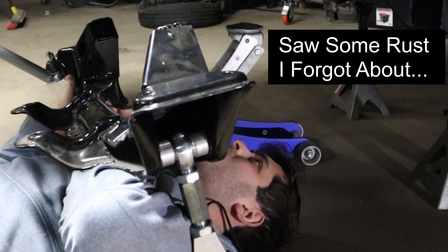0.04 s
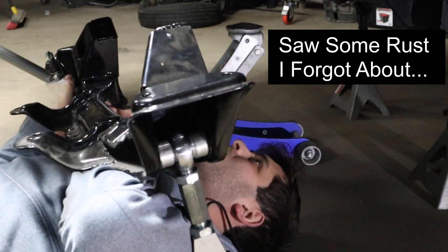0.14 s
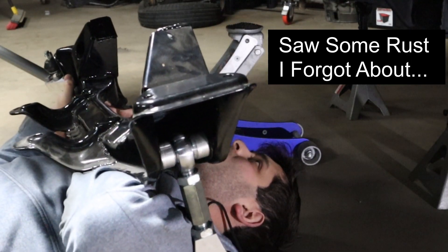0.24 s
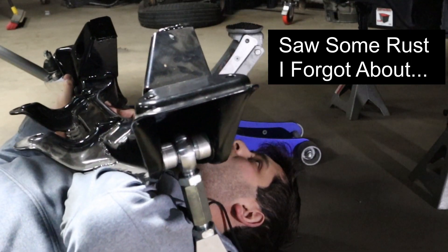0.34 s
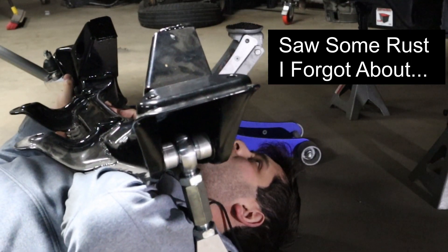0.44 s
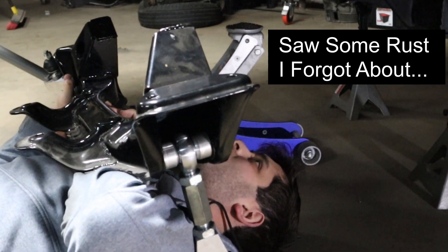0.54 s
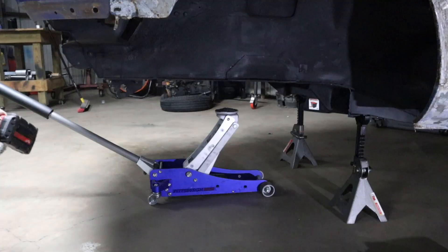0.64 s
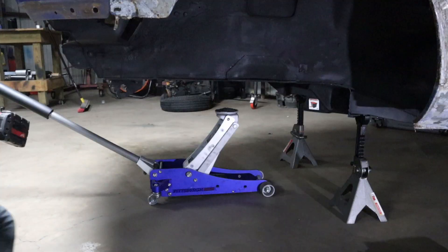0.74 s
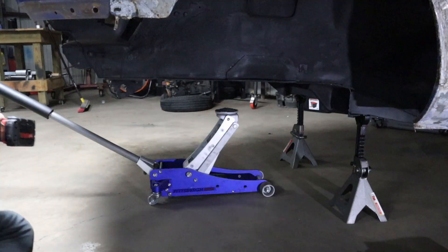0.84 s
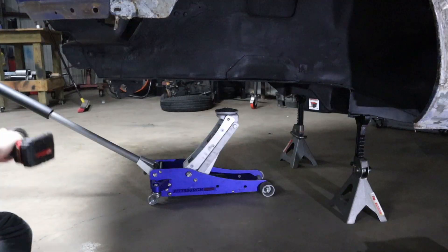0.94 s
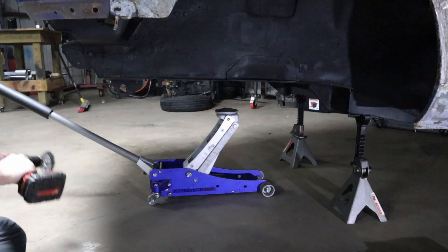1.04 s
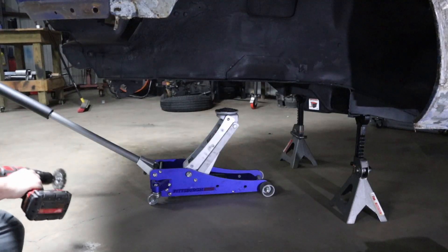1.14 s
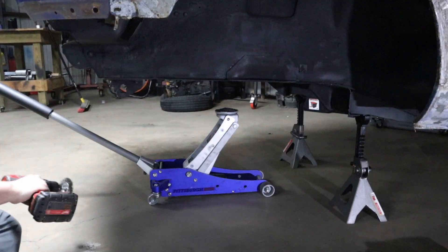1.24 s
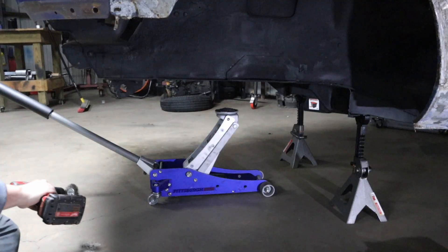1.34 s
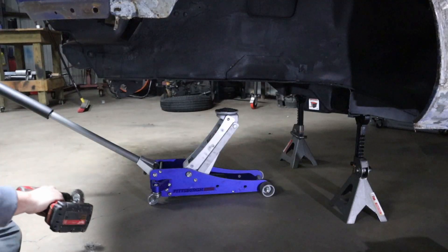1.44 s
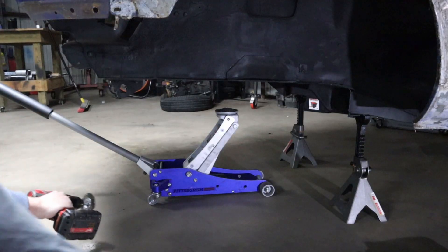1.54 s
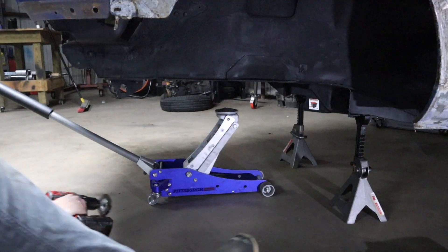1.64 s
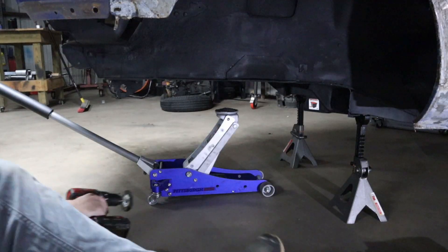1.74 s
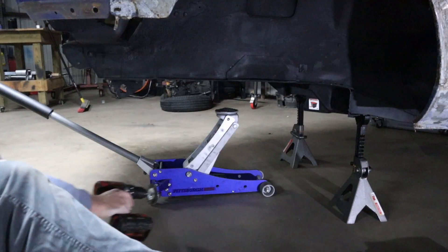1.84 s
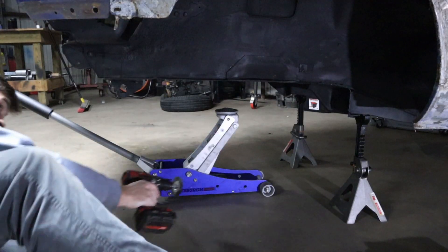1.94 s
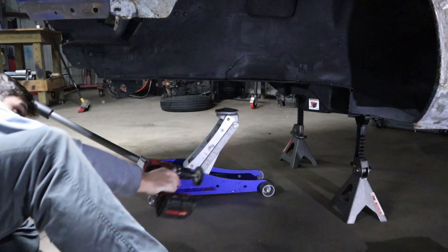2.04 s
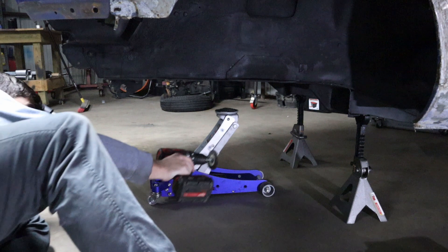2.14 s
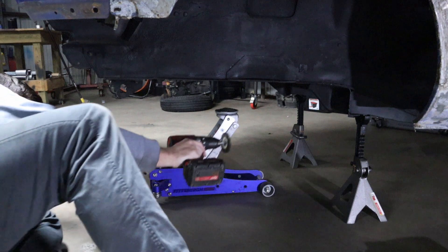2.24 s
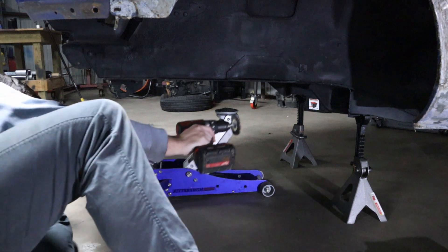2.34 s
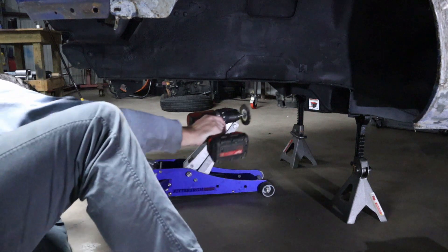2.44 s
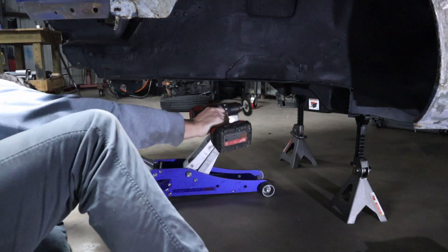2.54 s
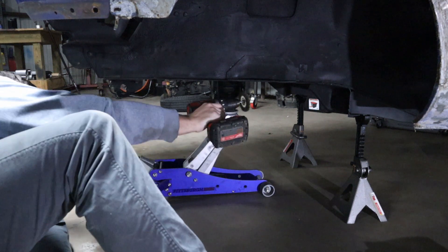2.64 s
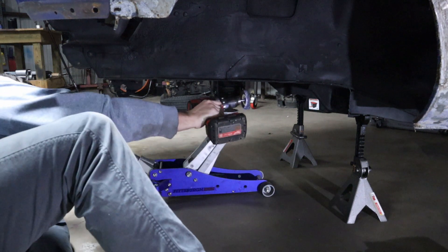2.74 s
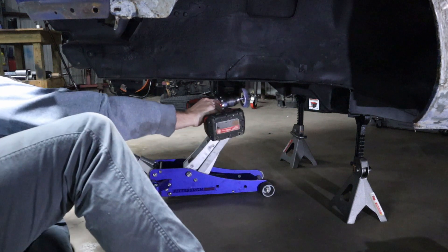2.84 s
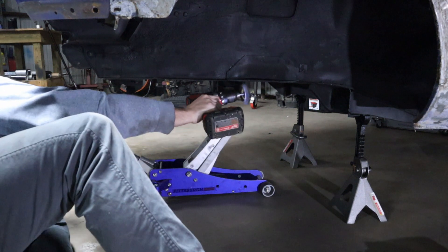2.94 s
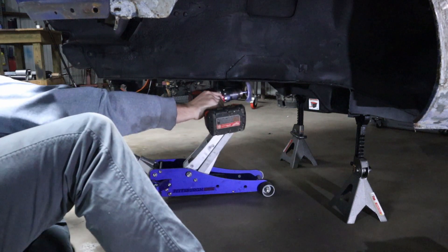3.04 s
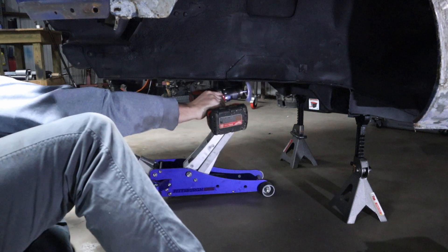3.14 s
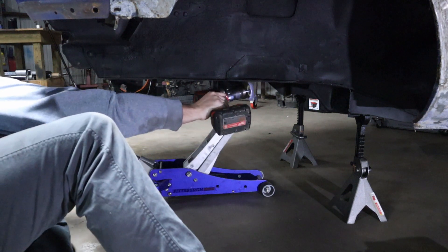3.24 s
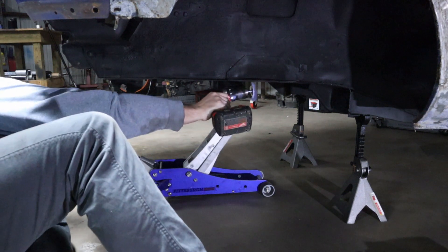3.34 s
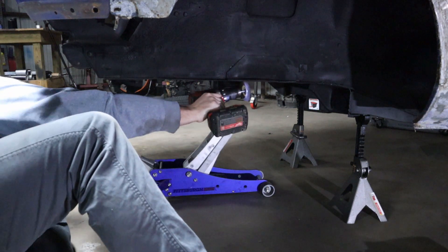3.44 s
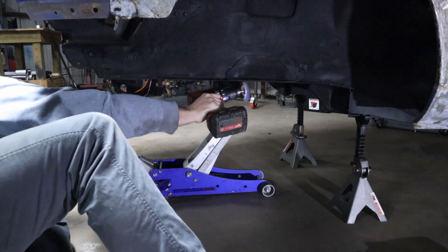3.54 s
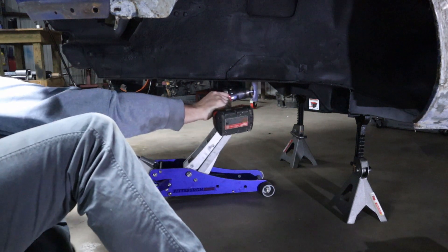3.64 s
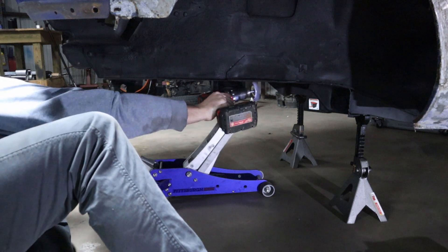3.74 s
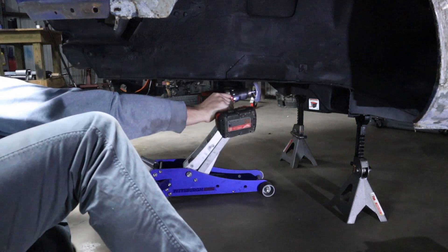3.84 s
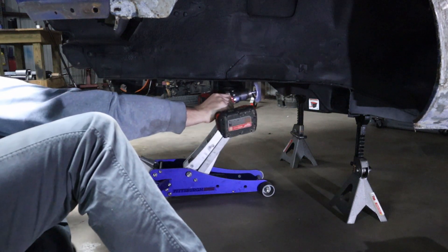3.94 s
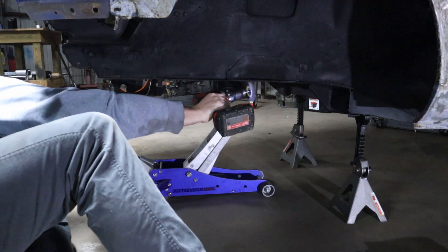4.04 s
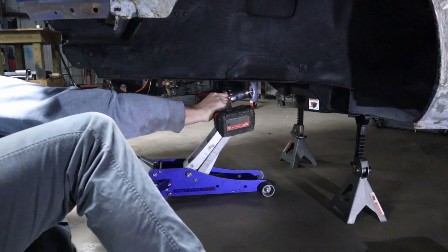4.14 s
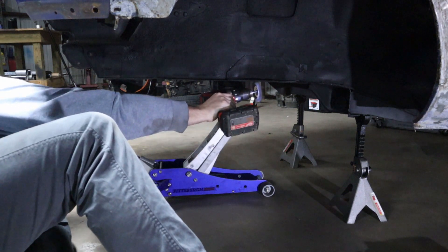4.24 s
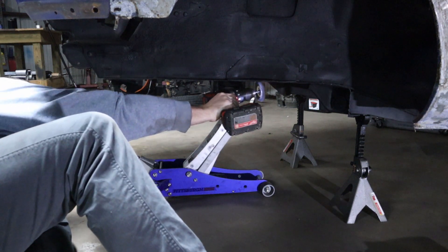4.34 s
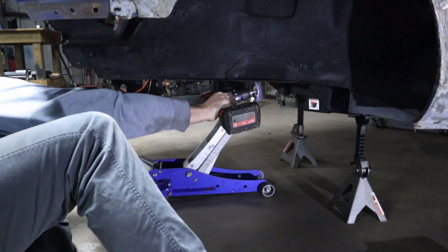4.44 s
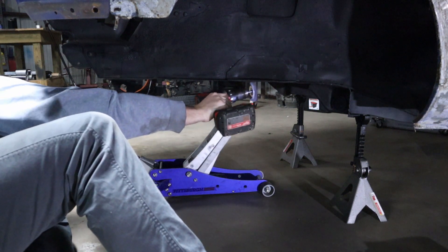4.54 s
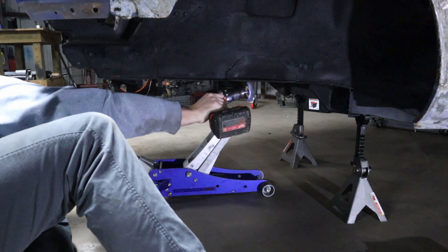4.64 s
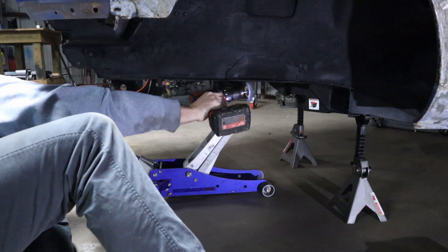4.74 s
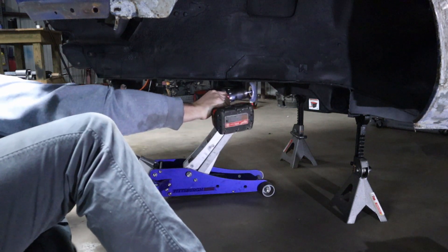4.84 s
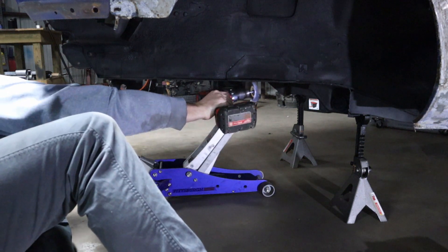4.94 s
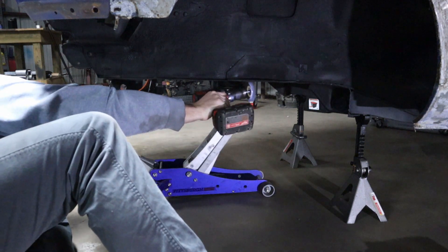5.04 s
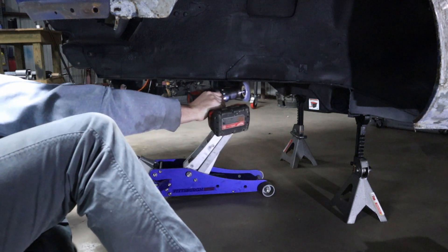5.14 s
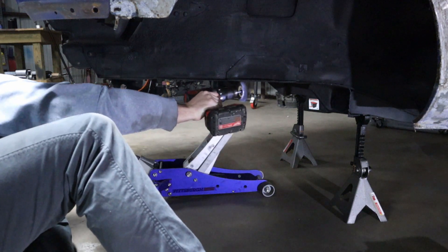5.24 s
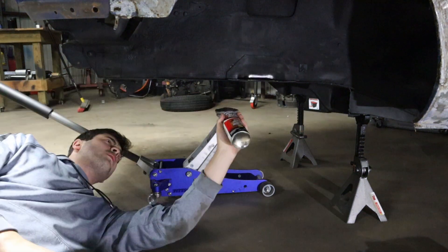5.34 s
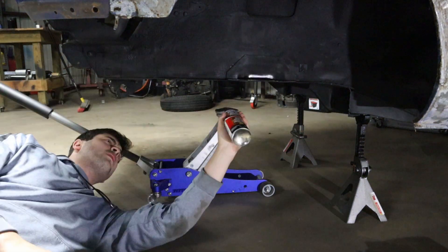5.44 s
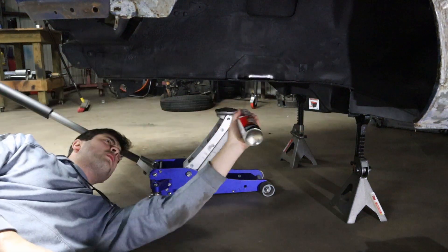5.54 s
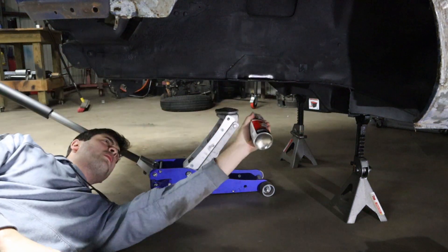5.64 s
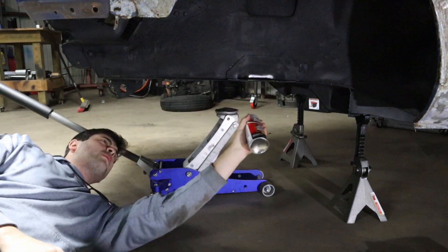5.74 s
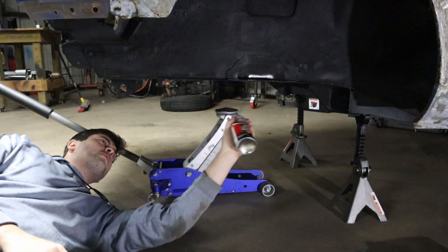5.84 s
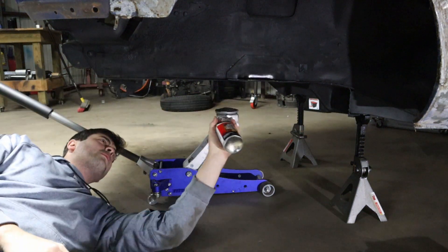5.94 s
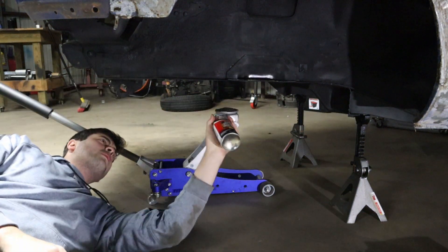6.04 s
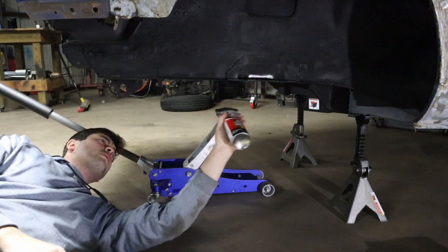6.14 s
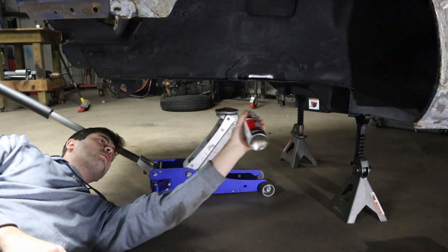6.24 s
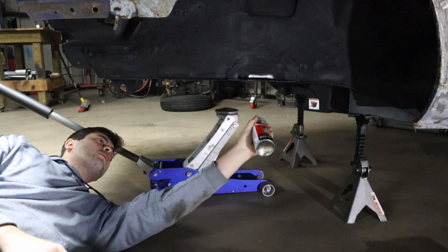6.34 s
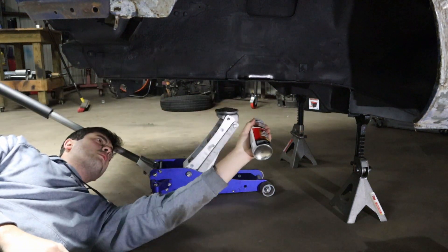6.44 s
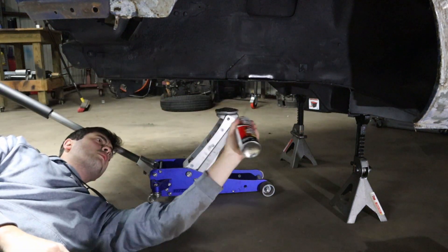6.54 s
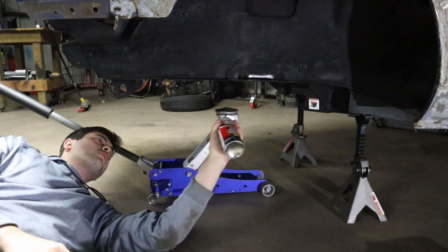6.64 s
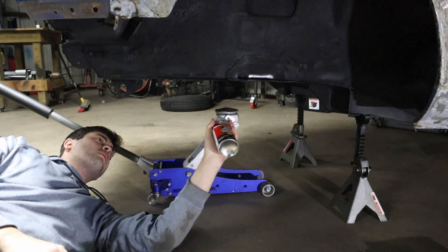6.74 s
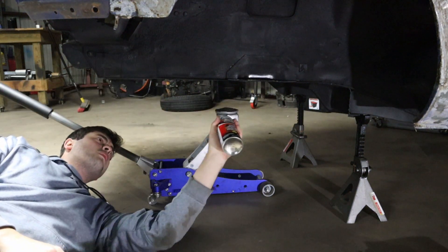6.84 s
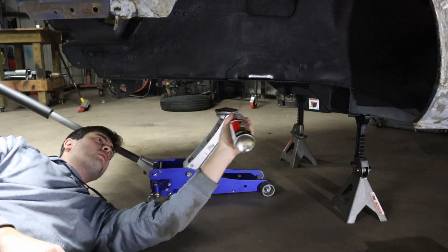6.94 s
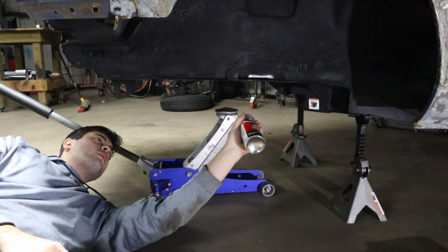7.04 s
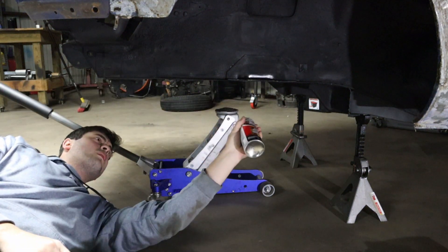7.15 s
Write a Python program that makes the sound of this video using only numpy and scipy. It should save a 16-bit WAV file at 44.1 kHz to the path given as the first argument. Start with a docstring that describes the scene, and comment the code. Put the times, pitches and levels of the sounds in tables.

```python
"""Wire wheel and spray can in a garage

Three shots: near silence; a man slides over the concrete and runs a cordless drill with a wire wheel
against a car's underside; then he gives the spot short bursts from a spray can.
One motor speed drives the gear whine, the rattle of the teeth and the geared-down throb of the wheel.
Grit, cloth, wire and spray are coloured grains or noise; knocks and the mixing ball ring decaying modes.
"""
import sys
import numpy as np
from scipy import signal
from scipy.fft import rfft, irfft
from scipy.io import wavfile

SR = 44100
rng = np.random.default_rng(int(sys.argv[2]) if len(sys.argv) > 2 else 0)


def materialize(psi):
    """Save the field psi as 16-bit PCM at rate SR to the path in sys.argv[1].

    A 1-D psi becomes a single channel; in a 2-D psi each row is a channel.
    """
    bounded = np.clip(np.atleast_2d(psi).T, -1, 1)
    quanta = np.round(bounded * 32767).astype(np.int16)
    wavfile.write(sys.argv[1], SR, quanta)


N = 316990
TIME = np.arange(N) / SR  # s

WORK_CUT_S, SPRAY_CUT_S = .707, 5.3775  # start of the second and third shot
EDGE_HZ = 15750  # upper band edge

# Motor: trigger time, and the time constant with which it nears its running speed
TRIGGER_S, SPIN_UP_S = 2.9345, .086
GEAR_RATIO = 15  # motor turns per wheel turn
# running speed, sagging as the hand leans on the wheel: (t/s, f/Hz in turns per second)
RUNNING_SPEED = [(3.42, 348.9), (3.62, 349.5), (3.74, 349.0), (3.87, 347.7), (4.0, 349.4), (4.14, 347.2),
                 (4.29, 349.2), (4.43, 347.9), (4.51, 346.5), (4.62, 345.9), (4.76, 347.4), (4.93, 348.0),
                 (5.01, 346.7), (5.17, 345.6), (5.3, 346.5)]
# lines of the motor: (multiple of motor speed, level/dB)
MOTOR_LINES = [(2, -49), (3, -53.5), (4, -42.5), (5, -58), (7, -63.5), (9, -52.5), (11, -61), (13, -65),
               (14, -46.5), (16, -48), (17, -48.5), (18, -51.5), (21, -53.5), (22, -53), (25, -65),
               (26, -68), (27, -67), (28, -56.5), (29, -53), (31, -76), (36, -56), (40, -57)]
# lines of the slower gear stage: (multiple of motor speed, level/dB)
SLOW_GEARS = [(10.2, -53.5), (12.3, -47.5)]

# strong gear tones, before lifts and swells:
# (multiple of motor speed, level/dB at full speed, loss/dB at standstill, scattered share at full speed)
WHINE = [(10, -44, 11, 0.18), (15, -39.5, 30, 0.22), (20, -44.5, 21, .7), (30, -45, 35, .5)]
WAVER_HZ = 6  # how fast the scattered share beats against its tone
WHINE_ROUGH_DB, WHINE_ROUGH_HZ = 1.85, 21.9  # quick unevenness of the tooth contact
# housing resonances that the tones glide through: (f/Hz, width f/Hz, lift level/dB)
HOUSING = [(2350, 100, 15), (2720, 90, 9), (4750, 200, 2.5), (6200, 280, 10), (9740, 320, 4.5)]
# the two loudest gear tones swell and fade as the hand moves: (t/s, extra level/dB)
LOW_TONE_SWELL = [(3.1, 1), (3.26, -7), (3.36, 3.5), (3.46, -15), (3.62, 7), (3.73, 5), (3.88, -1.5),
                  (4.62, 0), (4.82, 3.5)]
HIGH_TONE_SWELL = [(3.2, -0.5), (3.5, -9), (3.74, 5.5), (3.87, -10), (3.98, 1), (4.19, 2.5), (4.35, -2.5),
                   (4.58, 5), (4.76, 2.5), (4.89, -6.5), (5.07, 5.5), (5.16, -6), (5.28, 3.5)]

# the wheel shakes the panel: (multiple of wheel speed, relative level/dB)
THROB = [(2, -34), (4, -14.5), (7, -1.5), (8, -7), (9, -12.5), (10, -11), (11, -7), (12, -11), (13, -5.5),
         (14, -12), (15, -11.5), (21, -9.5)]
THROB_DB, THROB_STALL_DB = -57, 86  # gain at full speed; loss at standstill
SEATED_S, SEATED_DB = (3.85, 4.58), 2  # the throb is stronger while the wheel sits flat on the panel
UNSEATED_DB_PER_S = 4  # and it builds up until then

# Rattle of the teeth: colour (f/Hz, level/dB)
RATTLE = [(300, -26), (1500, -11.5), (3200, -6), (4200, 1), (5000, 0), (6200, -1.5), (7200, -8.5),
          (8500, -10), (10200, -10.5), (12500, -13.5), (14000, -19), (15700, -44)]
RATTLE_DB, RATTLE_POWER = -34.5, 1.4  # at full speed, before bites and echoes; power of the speed
# reflections off the car's underside: (delay t/s, level/dB)
ECHOES = [(.0009, -25), (.0017, -33.5), (.0029, -19), (.0044, -11.5)]

# Colour of the car panel under the wheel: (f/Hz, level/dB)
PANEL = [(60, -48), (150, -14), (280, -10.5), (420, -8.5), (560, 2), (800, -7), (1000, -0.5), (1180, -5.5),
         (1400, 4.5), (1850, -3.5), (2250, 5.5), (2480, -1.5), (2750, 5), (3300, -17), (7000, -14)]
SCRAPE_DB, SCRAPE_STALL_DB = -42, 18.5  # at full speed, before bites; loss at standstill
# the wheel bites harder into the rust: (start t/s, end t/s, extra scrape level/dB)
BITES = [(3.334, 3.38, 1.5), (4.223, 4.255, 1.5), (4.777, 4.824, 3.5), (4.969, 5.02, 4.5),
         (5.23, 5.28, 2.5)]
BITE_S, BITE_RATTLE = 0.027, .35  # time constant of grip and release; share of a bite's dB in the rattle

# Body over gritty concrete: colour (f/Hz, level/dB)
DRAG = [(150, -49), (300, -16.5), (450, -7), (680, -1.5), (1050, -4), (1600, -2), (2200, -2), (2800, -2),
        (5300, -3.5), (7500, -15.5), (10000, -28), (13000, -32), (15500, -42)]
# its shoves: (start t/s, end t/s, level/dB)
SHOVES = [(.70, .97, -53.5), (1.06, 1.10, -55), (1.135, 1.16, -43.5), (1.23, 1.29, -43.5),
          (1.33, 1.40, -54), (1.47, 1.52, -45.5), (1.57, 1.59, -52), (1.67, 1.73, -50.5),
          (1.89, 1.92, -53.8), (2.095, 2.52, -53), (2.62, 2.69, -47.8)]
SHOVE_RISE_S, SHOVE_FALL_S = 0.034, 0.025  # time constants
# Cloth of the swinging limbs: colour (f/Hz, level/dB)
SWISH = [(500, -51), (1500, -20), (3200, -14.5), (5200, 0), (6400, 0.5), (8000, -3.5), (9300, -8),
         (11500, -8), (13500, -13.5), (15500, -23)]
# its swishes: (start t/s, end t/s, level/dB)
SWISHES = [(.70, .88, -48), (.92, .96, -51.5), (1.11, 1.14, -54.5), (1.33, 1.43, -53), (1.48, 1.50, -47),
           (1.58, 1.65, -47.5), (1.70, 1.80, -55), (1.895, 1.91, -49.5), (2.105, 2.30, -57),
           (2.17, 2.21, -47), (2.33, 2.44, -45), (2.48, 2.535, -48), (2.66, 2.69, -62)]
SWISH_RISE_S, SWISH_FALL_S = 0.043, 0.025  # time constants
# the weave of the cloth zips over the floor: (middle t/s, bell spread t/s, f/Hz, width f/Hz, level/dB)
ZIPS = [(1.143, 0.033, 4940, 2800, -46.5), (1.49, 0.047, 2920, 895, -45), (1.479, 0.037, 4740, 1800, -43),
        (1.56, 0.018, 1140, 200, -56.5), (1.582, 0.018, 4160, 2800, -40.5),
        (1.673, 0.059, 5260, 900, -50.5), (2.186, 0.029, 5330, 700, -55), (2.41, 0.032, 6500, 1000, -41)]
CREEP_DRAG_DB, CREEP_SWISH_DB = -59, -62.5  # steady contact with the floor between the shoves
LIES_STILL_S, STILL_DB = 2.69, -10.5  # then he settles, and the drag contact drops by this much

# knocks of the drill in the hand: (t/s, peak level/dB, brightness f/Hz)
KNOCKS = [(1.212, -29, 5000), (1.260, -33, 2000), (1.777, -34.5, 1430), (2.820, -53, 10900),
          (2.928, -37.5, 4200), (2.942, -31.5, 3520)]
# ringing modes of its casing: (f/Hz, level/dB, t60 t/s)
CASING = [(644, -7, 0.049), (784, 7.5, 0.011), (1390, 6, 0.012), (1620, 4, 0.012), (2700, -2, 0.025),
          (3500, 5, 0.013), (6050, -7, .015)]

# bursts of the spray can: (start t/s, end t/s, level/dB once the surge has sagged)
BURSTS = [(5.306, 5.474, -56), (5.656, 5.81, -57.5), (5.936, 6.082, -57), (6.3, 6.448, -56.5),
          (6.621, 6.786, -56), (7.047, 7.25, -57)]
# colour of its nozzle: (f/Hz, level/dB)
NOZZLE = [(240, -51), (400, -38), (614, -9.5), (673, -14), (796, -15.5), (1490, -13), (1590, -15),
          (2190, -7), (3410, -9), (3790, -4.5), (5910, 2), (6380, -2), (12100, -5.5), (15500, -15.5)]
# the mixing ball hits the can: (t/s, peak level/dB, brightness f/Hz)
BALL = [(5.851, -54, 3300), (5.872, -58, 3300), (5.909, -42, 12000), (6.497, -49.5, 3000),
        (6.522, -57, 2500), (6.569, -42.5, 8000), (6.608, -49, 8000)]
# ringing modes of the can: (f/Hz, level/dB, t60 t/s)
CAN = [(810, -11, .03), (1555, -8, .04), (1790, -6, 0.036), (2730, -4, .04), (3100, -7.5, .03),
       (3500, -1, 0.028), (4360, -3, .025), (6600, -3, 0.022), (7150, -2, 0.023)]
# the sleeve rubs as the arm sweeps the can: (start t/s, end t/s, level/dB)
SLEEVE = [(6.0, 6.08, -80), (6.56, 6.65, -66.5), (6.78, 6.91, -71), (7.12, 7.19, -72)]
SLEEVE_RISE_S, SLEEVE_FALL_S, SLEEVE_REST_DB = 0.1, 0.038, -78  # time constants; level between rubs

# soft bumps of limbs on the floor: (t/s, peak level/dB, f/Hz, time t/s for a 120 dB decay under the swell)
BUMPS = [(2.025, -49.5, 71.4, 0.18), (2.50, -54.5, 392, 0.083), (2.795, -59, 71, 0.18),
         (5.73, -70, 135, 0.15), (5.98, -68, 289, 0.13), (6.686, -62.5, 278, 0.11),
         (6.755, -59.5, 318, 0.086), (7.092, -60.5, 310, 0.13)]
# Reverberation of the garage: (f/Hz, t60 t/s)
GARAGE = [(150, 0.72), (1000, 0.52), (5000, 0.62), (9000, 0.47), (15000, 0.38)]
# Colour of the room tone: (f/Hz, level/dB)
AIR = [(20, -43), (45, -10), (70, 3), (100, 1), (125, 6.5), (180, -5.5), (400, -10.5), (1000, -18),
       (3000, -22.5), (8000, -22.5), (13000, -38), (15000, -48)]
# Colour of the faint hiss: (f/Hz, level/dB)
HUSH = [(30, -11), (150, -1), (700, -4.5), (3000, -9.5), (12000, -13), (14000, -33)]


def drill():
    """The motor whines through its gears; the teeth rattle each turn; the wire wheel scours the panel."""
    slack = np.exp(-np.maximum(TIME - TRIGGER_S, 0) / SPIN_UP_S)  # share of the speed still to be gained
    speed = curves(RUNNING_SPEED)[0] * (1 - slack)
    turns = np.cumsum(speed * (1 + 0.00038 * drift(30))) / SR
    wheel = turns / GEAR_RATIO
    bite_db = sum(db * stroke(start, end, BITE_S, BITE_S) for start, end, db in BITES)
    force = amp(-140 * slack ** 1.676)  # unbalance grows with speed
    tones = gear_whine(speed, slack, turns) + force * motor_lines(speed, turns)
    tones = tones + force ** 2 * slow_gears(turns) + wheel_throb(slack, wheel)
    rattle = nearby(tooth_rattle(slack, turns, wheel, bite_db))
    scrape = wheel_scrape(slack, wheel, bite_db)
    return tones * ramp(2.955, 0.058) + (rattle + scrape) * ramp(TRIGGER_S, 0.008)


def gear_whine(speed, slack, turns):
    """Tooth tones grow with speed, flare in the housing's resonances and waver."""
    swells_db = curves(LOW_TONE_SWELL) + curves(HIGH_TONE_SWELL) + [0, 0]
    out = 0
    for (order, db, stall_db, scattered), swell_db in zip(WHINE, swells_db):
        lift_db = sum(lift * np.exp(-((order * speed - hz) / width) ** 2) for hz, width, lift in HOUSING)
        rough_db = WHINE_ROUGH_DB * drift(WHINE_ROUGH_HZ)
        level_db = db - stall_db * slack + lift_db + swell_db + rough_db
        out += amp(level_db) * line(turns, order, fade=scattered * (1 - slack), fade_hz=WAVER_HZ)
    return out


def motor_lines(speed, turns):
    """Multiples of the motor speed swell as they glide into a panel resonance."""
    out, top = 0, speed.max()
    for order, db in MOTOR_LINES:
        body_db = np.minimum(read(PANEL, order * speed) - read(PANEL, order * top), 0)
        fade = min(0.025 * order, 1)  # short waves fade more
        out += amp(db + body_db) * line(turns, order, fade, fade_hz=7)
    return out


def slow_gears(turns):
    """The slower gear stage adds wavering lines between the whole multiples of the motor speed."""
    return sum(amp(db) * line(turns, order, fade=1.0, fade_hz=9.9) for order, db in SLOW_GEARS)


def wheel_throb(slack, wheel):
    """Multiples of the wheel speed shake the panel, hardest while the wheel sits flat."""
    shake_db = THROB_DB - THROB_STALL_DB * slack
    shake_db = shake_db - UNSEATED_DB_PER_S * np.maximum(SEATED_S[0] - TIME, 0)
    shake_db = shake_db + SEATED_DB * stroke(*SEATED_S, rise=.12, fall=.04)
    return amp(shake_db) * sum(amp(db) * line(wheel, order, fade=0.39, fade_hz=6) for order, db in THROB)


def tooth_rattle(slack, turns, wheel, bite_db):
    """Noise of the teeth pulses with each turn of motor and wheel and grows with speed."""
    teeth = (1 + 0.13 * np.cos(2 * np.pi * turns)) * (1 + 0.021 * np.cos(2 * np.pi * wheel))
    level = amp(RATTLE_DB + BITE_RATTLE * bite_db) * (1 - slack) ** RATTLE_POWER
    return level * colour(teeth * rng.standard_normal(N), RATTLE)


def wheel_scrape(slack, wheel, bite_db):
    """Countless bristle impacts excite the panel, louder where the wheel bites."""
    bristles = grains(per_s=7000, spread_db=1.0) * (1 + 0.028 * np.cos(2 * np.pi * wheel))
    level_db = SCRAPE_DB - SCRAPE_STALL_DB * slack + bite_db + 1.35 * drift(25)
    return amp(level_db) * colour(bristles, PANEL)


def spray():
    """The valve opens on full pressure, which sags until the finger lifts."""
    flow = np.zeros(N)
    for start, end, db in BURSTS:
        surge = 1 + 4.0 * np.exp(-np.maximum(TIME - start, 0) / 0.028)
        flow += amp(db) * surge * ramp(start, 0.034) * (1 - ramp(end, 0.014))
    return flow * amp(.5 * drift(45)) * colour(rng.standard_normal(N), NOZZLE)


def mixing_ball():
    """The ball strikes the thin can and rings its modes."""
    return hits(BALL, CAN, tick=1.05, tick_t60=0.036, detune=.05)


def sliding():
    """Grit drags under the body while cloth swishes and zips over the concrete in tiny slips."""
    settled_db = STILL_DB * ramp(LIES_STILL_S, .07)
    push = strokes(SHOVES, SHOVE_RISE_S, SHOVE_FALL_S, CREEP_DRAG_DB + settled_db)
    swing = strokes(SWISHES, SWISH_RISE_S, SWISH_FALL_S, CREEP_SWISH_DB + 1.2 * settled_db)
    drag = push * amp(0.98 * drift(40)) * colour(grains(per_s=10000, spread_db=2.5), DRAG)
    cloth = grains(per_s=12000, spread_db=-0.3) + 0.2 * grains(per_s=420, spread_db=22.0)
    swish = swing * amp(0.54 * drift(50)) * colour(cloth, SWISH)
    slips, zips = grains(per_s=2800, spread_db=2.5), 0
    for middle, spread, hz, width, db in ZIPS:
        bell = np.exp(-((TIME - middle) / spread) ** 2 / 2)
        zips += amp(db) * bell * band(slips, hz, width)
    return (drag + swish + zips) * (1 - ramp(2.91, 0.12))


def drill_knocks():
    """Knocks of the drill in the hand ring its casing."""
    return hits(KNOCKS, CASING, tick=1.8, tick_t60=0.052, detune=0.033)


def sleeve():
    """Soft cloth friction."""
    rub = strokes(SLEEVE, SLEEVE_RISE_S, SLEEVE_FALL_S, SLEEVE_REST_DB)
    cloth_colour = [(200, -19), (750, 6.0), (1800, 3.5), (4000, -1), (12000, -35)]  # (f/Hz, level/dB)
    return rub * colour(grains(per_s=2700, spread_db=3.5), cloth_colour)


def bumps():
    """Padded pushes: a soft rise and a few uneven low cycles."""
    out, t = np.zeros(N), TIME[:SR // 2]
    for s, db, hz, decay in BUMPS:
        swell = t ** 2 * amp(-120 * t / decay)
        turns = np.cumsum(hz * (1 + 0.25 * drift(hz / 2)[:len(t)])) / SR
        add(out, s, amp(db) * swell / swell.max() * np.sin(2 * np.pi * turns))
    return out


def room_tone():
    """Steady noise in the colour of the garage air."""
    return amp(-68.5) * colour(rng.standard_normal(N), AIR)


def faint_hiss():
    """Very quiet steady noise that lies under all three shots."""
    return amp(-89) * colour(rng.standard_normal(N), HUSH)


def garage(x, wet_db):
    """Adds a diffuse tail whose bands die at their own speed."""
    hz, t, z = signal.stft(rng.standard_normal(SR), SR, nperseg=256)
    decay = amp(-60 * t / read(GARAGE, hz)[:, None])
    tail = signal.istft(z * decay, SR, nperseg=256)[1]
    tail = tail * ramp(0.0019, 0.0023)[:len(tail)]
    return x + amp(wet_db) * signal.fftconvolve(x, tail / np.linalg.norm(tail))[:N]


def nearby(x):
    """Close hard surfaces comb the sound."""
    out = x.copy()
    for delay, db in ECHOES:
        add(out, delay, amp(db) * x)
    return out


def hits(rows, modes, tick, tick_t60, detune):
    """Each blow has its own brightness, rings the modes slightly detuned and ticks."""
    out, t = np.zeros(N), TIME[:SR // 4]
    for s, db, bright_hz in rows:
        ring = 0
        for hz, level, t60 in modes:
            turns = hz * (1 + detune * rng.uniform(-0.94, 1)) * t + rng.random()
            ring += amp(level - 60 * t / t60) * np.sin(2 * np.pi * turns)
        crack = tick * rng.standard_normal(len(t)) * amp(-60 * t / tick_t60)
        blow = (ring + crack) * np.minimum(t / 0.0024, 1)
        blow = signal.lfilter(*signal.butter(2, min(bright_hz, SR / 3), fs=SR), blow)
        blow = signal.lfilter(*signal.butter(1, 350, "high", fs=SR), blow)  # small things radiate little bass
        add(out, s, amp(db) * blow / abs(blow).max())
    return out


def line(turns, order, fade, fade_hz):
    """One partial, with a share of scattered sound that beats against it."""
    scatter = (drift(fade_hz) + 1j * drift(fade_hz)) / np.sqrt(2)
    wave = np.exp(2j * np.pi * (order * turns + rng.random()))
    return (wave * (1 + fade * scatter)).real * np.sqrt(2 / (1 + fade ** 2))


def grains(per_s, spread_db):
    """Tiny impacts of uneven size at random times, at rms 1."""
    size = amp(spread_db * np.minimum(rng.exponential(1, N), 4)) * rng.choice([-1, 1], N)
    return unit(size * (rng.random(N) < per_s / SR))


def band(x, hz, width):
    """A steep resonance, at rms 1."""
    pole = np.exp((2j * hz - width) * np.pi / SR)
    return unit(signal.lfilter([1], np.poly([pole, pole]), x + 0j).real)


def colour(x, points):
    """Gives x a spectrum, at rms 1."""
    size = 2 ** 19  # longer than the sound
    gain = amp(read(points, np.fft.rfftfreq(size, 1 / SR)))
    return unit(irfft(rfft(x, size) * gain)[:N])


def drift(hz):
    """Smooth chance of rms 1 that moves about hz times a second."""
    knots = rng.standard_normal(8192)
    return unit(np.interp(TIME * 2 * hz, np.arange(len(knots)), knots))


def stroke(start, end, rise, fall):
    """Swells up to start, holds until end, dies away; rise and fall are time constants."""
    return np.exp(-np.maximum(start - TIME, 0) / rise - np.maximum(TIME - end, 0) / fall)


def strokes(rows, rise, fall, rest_db):
    """Gain of a series of rubbing strokes over a resting level, summed as power."""
    power = sum((amp(db) * stroke(start, end, rise, fall)) ** 2 for start, end, db in rows)
    return np.sqrt(amp(rest_db) ** 2 + power)


def ramp(s, length):
    """Rises from 0 to 1, starting at s."""
    return np.clip((TIME - s) / length, 0, 1)


def read(points, hz):
    """Reads a table on a log-frequency axis."""
    f, value = np.transpose(points)
    return np.interp(np.log(hz + 1), np.log(f + 1), value)


def curves(rows):
    """Each column of a timed table, sample by sample."""
    s, *columns = np.transpose(rows)
    return [np.interp(TIME, s, c) for c in columns]


def add(mix, s, sound):
    """Puts a sound into the mix at s."""
    part = mix[round(s * SR):][:len(sound)]
    part += sound[:len(part)]


def amp(db):
    """Decibels to gain."""
    return 10 ** (np.asarray(db) / 20)


def unit(x):
    """Scales to rms 1."""
    return x / np.sqrt(np.mean(x ** 2) + 1e-20)


def scene():
    """Three shots joined by hard cuts, the same in both channels."""
    work = drill() + garage(sliding() + drill_knocks(), wet_db=-11.5)
    painting = garage(spray() + mixing_ball(), wet_db=-7.5) + sleeve()
    air = room_tone() + garage(bumps(), wet_db=-11)
    begun, later = ramp(WORK_CUT_S, .002), ramp(SPRAY_CUT_S - .002, .002)
    mono = faint_hiss() + begun * (air + (1 - later) * work + later * painting)
    return np.array([mono, mono])


def record(dry):
    """The recorder's band limit: a steep low-pass."""
    low_pass = signal.firwin(511, EDGE_HZ, window=("kaiser", 9), fs=SR)
    return signal.oaconvolve(dry, low_pass[None], "same")


dry = scene()
out = record(dry)
materialize(out)
```